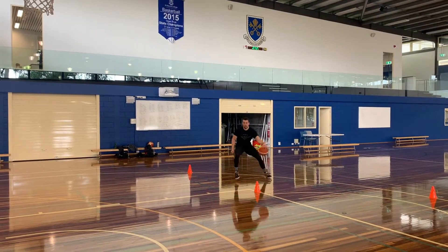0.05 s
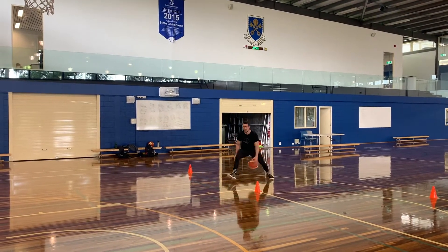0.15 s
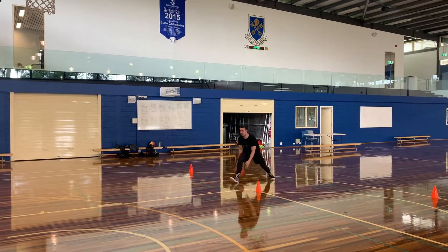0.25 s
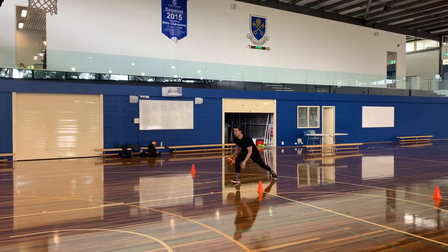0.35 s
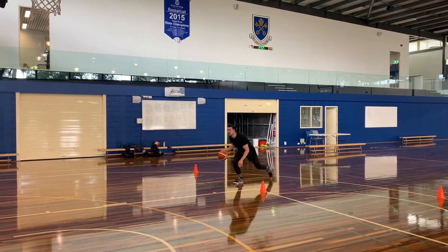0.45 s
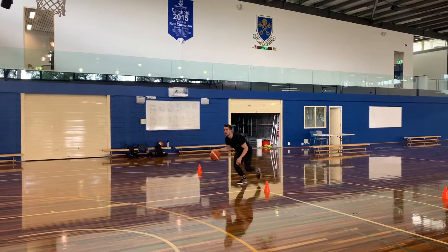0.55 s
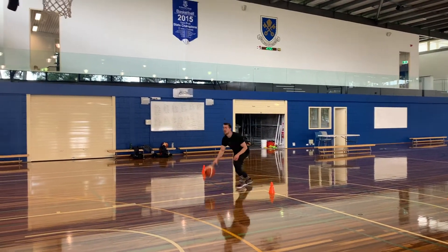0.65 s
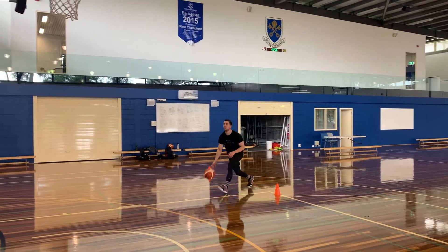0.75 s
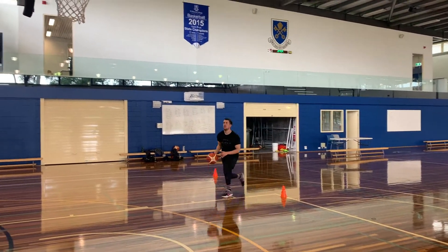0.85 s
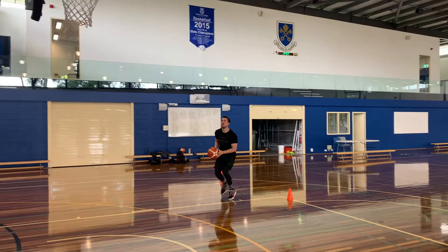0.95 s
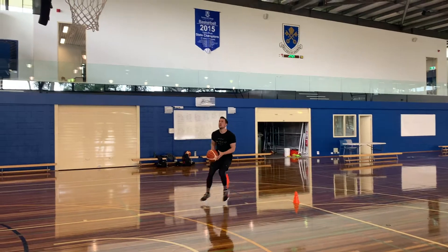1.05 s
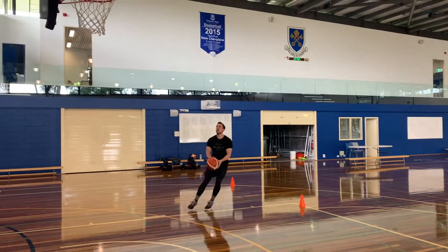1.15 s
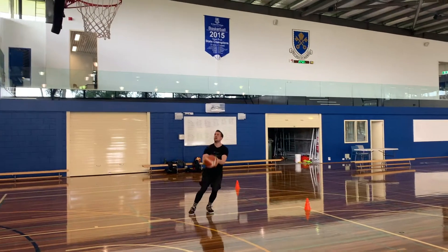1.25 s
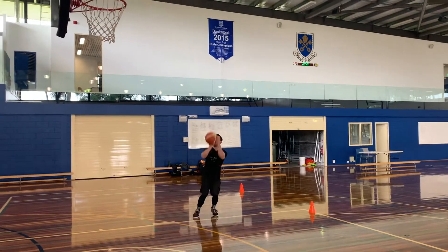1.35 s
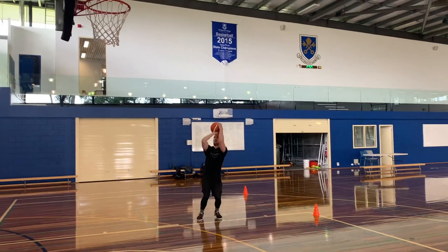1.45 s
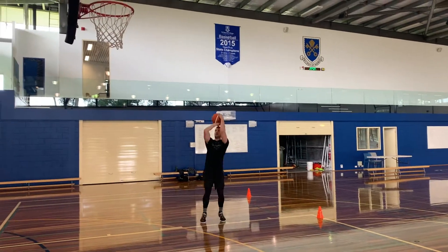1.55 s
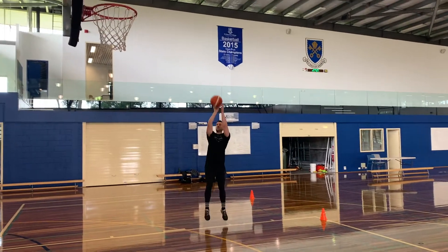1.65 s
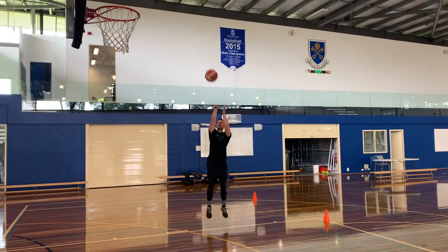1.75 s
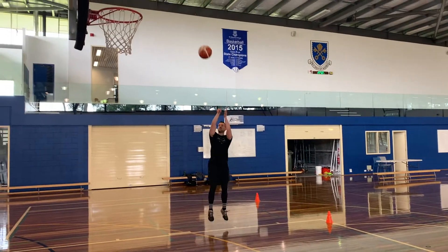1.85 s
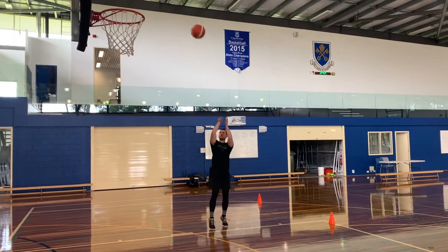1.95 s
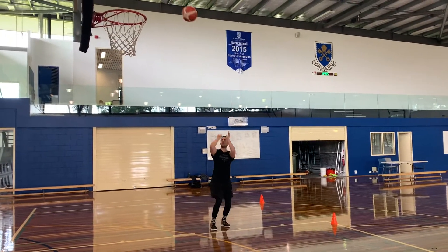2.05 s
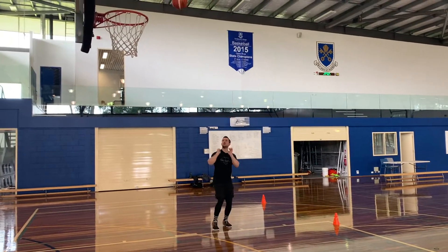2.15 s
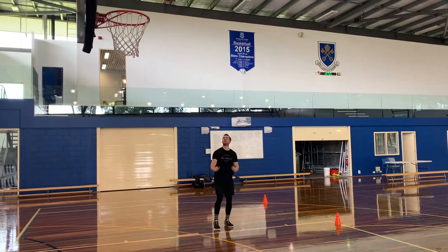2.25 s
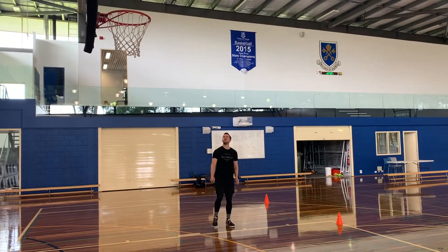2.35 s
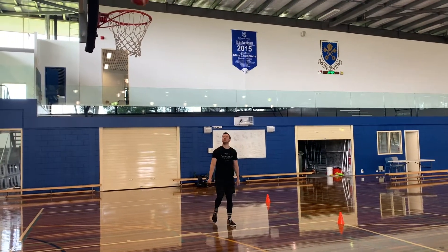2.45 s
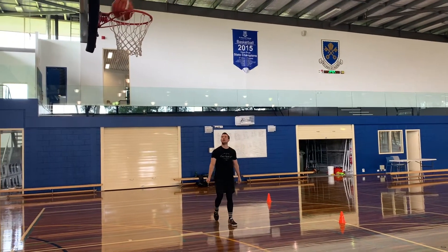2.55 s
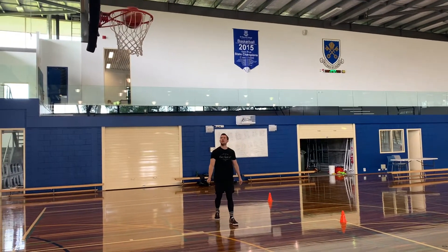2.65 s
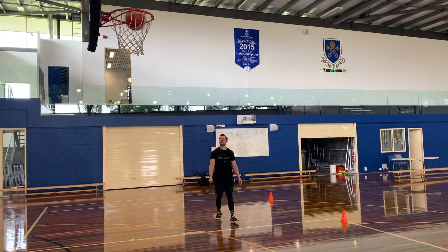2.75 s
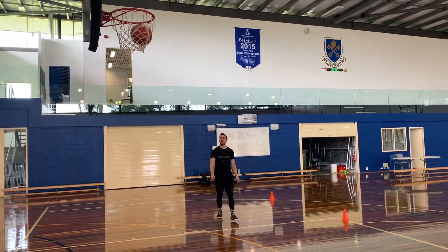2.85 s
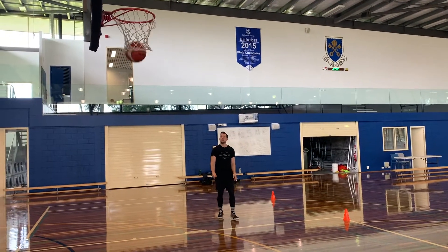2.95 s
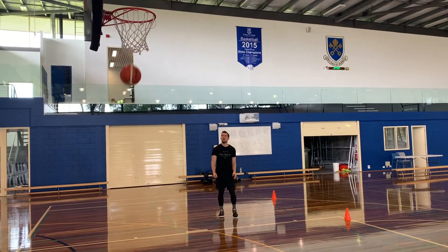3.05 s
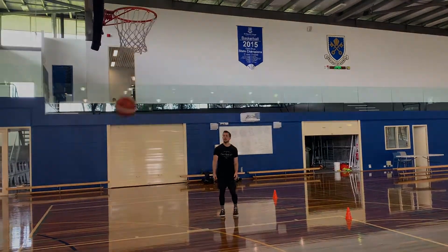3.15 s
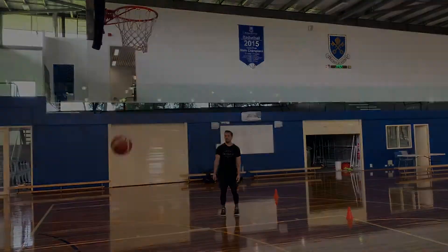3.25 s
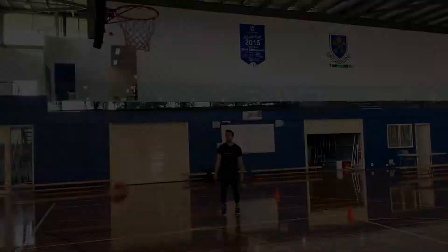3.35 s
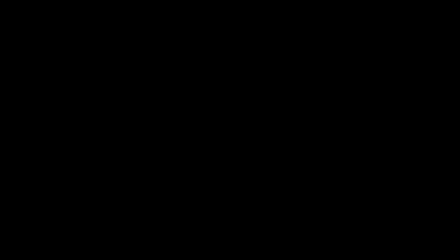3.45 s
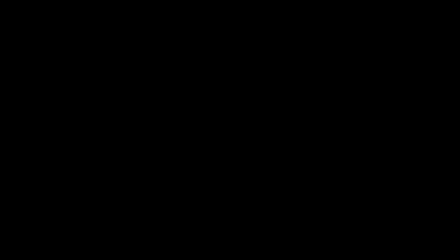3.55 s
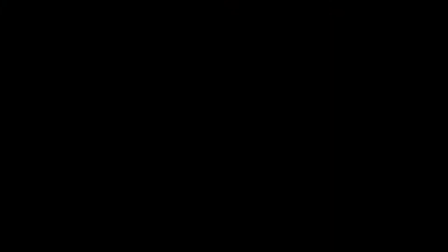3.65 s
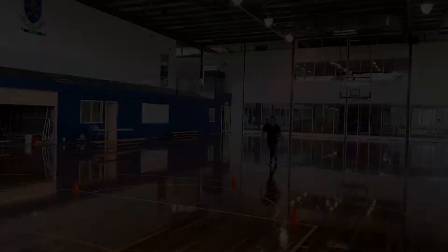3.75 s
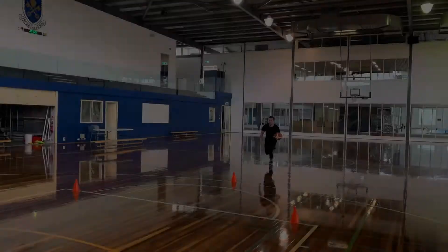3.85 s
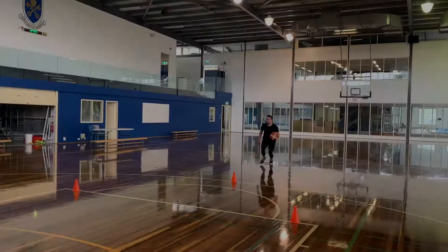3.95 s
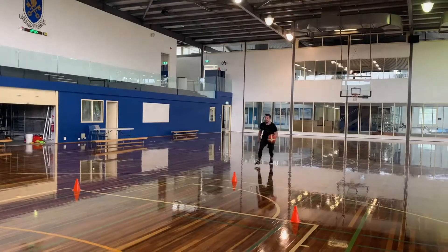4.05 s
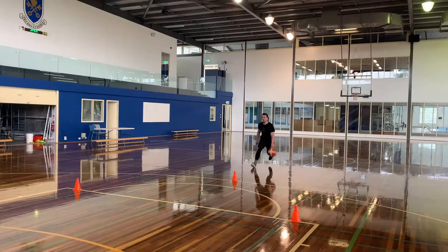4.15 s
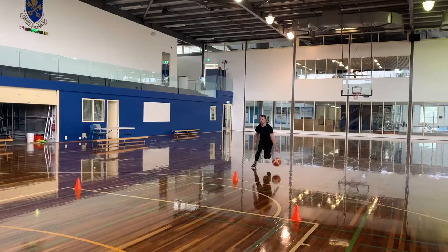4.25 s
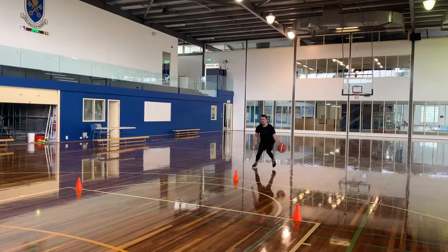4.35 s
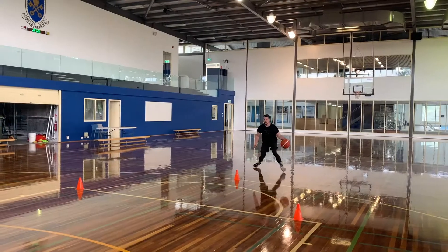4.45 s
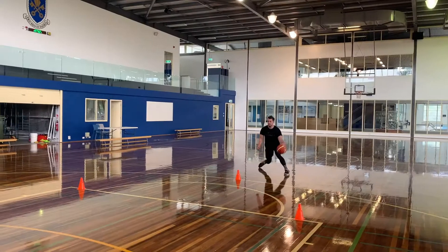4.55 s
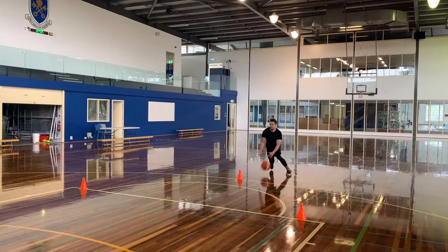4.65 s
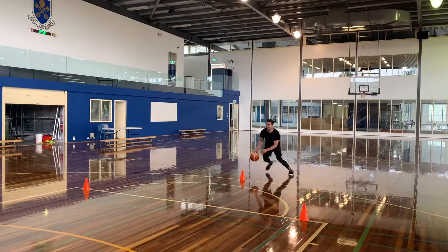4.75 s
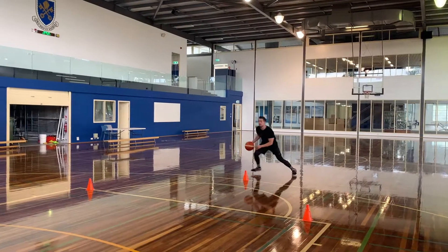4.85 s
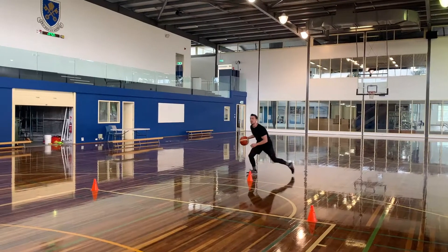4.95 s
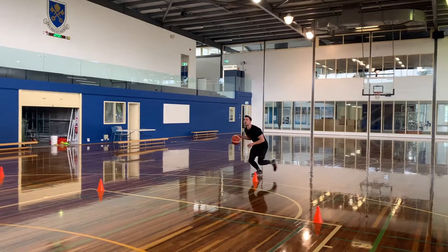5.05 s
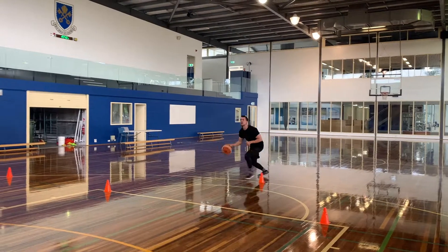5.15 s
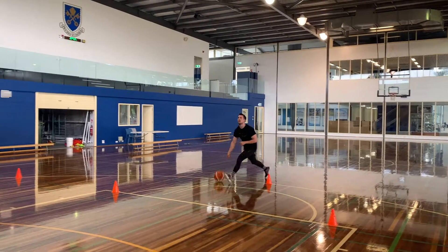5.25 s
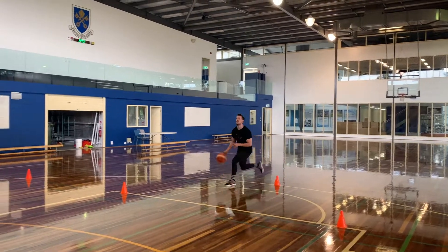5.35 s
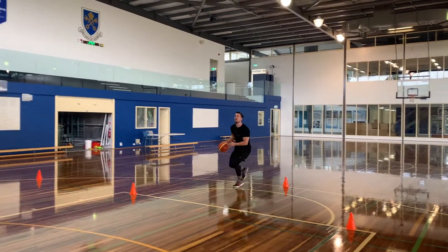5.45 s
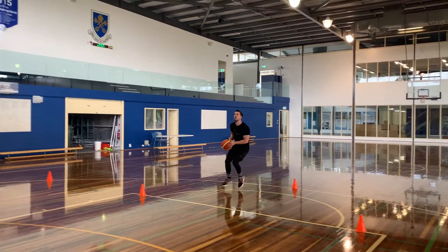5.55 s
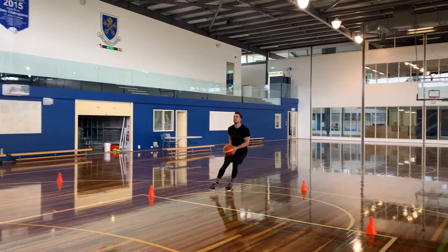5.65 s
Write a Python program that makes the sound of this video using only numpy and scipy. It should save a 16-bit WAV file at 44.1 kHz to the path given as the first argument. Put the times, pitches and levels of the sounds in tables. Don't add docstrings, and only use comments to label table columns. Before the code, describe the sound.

A large, hard-walled sports hall with low ventilation rumble, heard in wide stereo from some distance. Very short, high rubber squeaks chirp far off around 0.1 s. A basketball bounces lightly at 0.2 s and firmly at 0.7 s: each blow is a sharp tick, a brief hollow ping and a deep floor thump, with slapback echoes and a long tail. Near 1.15-1.25 s come a soft step and fainter, nearer squeaks; small footfalls tap at about 1.9-2.0 s. At 2.54 s a shot clips the hoop and rubs through the net, a scratchy swish with a dull board shudder until about 2.9 s. The ball smacks the floor at 3.5 s, echoing. The level dips around 3.6-4.1 s as the scene changes. Dribbles follow at 4.2, 4.7 and 5.25 s, the first the heaviest, with light steps between them and a faint, steady mid-pitched lamp hum until the end.

```python
import sys
import numpy as np
from scipy import signal
from scipy.fft import rfft, irfft
from scipy.io import wavfile
from scipy.ndimage import uniform_filter1d

SR = 44100
rng = np.random.default_rng(int(sys.argv[2]) if len(sys.argv) > 2 else 0)


def invert_db(x):
    u = np.asarray(x, float) / 20
    return 10 ** u


def master(y):
    cut = np.clip(np.atleast_2d(y).T, -1, 1)
    pcm = np.round(cut * 32767)
    wavfile.write(sys.argv[1], SR, pcm.astype(np.int16))


N = 250929
LEAD = SR // 2
M = N + LEAD
PRE = 512
NET_START_S, NET_END_S = 2.544, 3.4

# (time [s], tick [dB], thump [dB], ping [dB], hall send [dB])
BOUNCES = [
    (-.3, -40, -34, -40, 10.5),
    (0.2194, -14, -21, -23.5, 1.5),
    (0.6948, -7, -9.5, -13, 4),
    (2.5421, -36, -16, -58, -17),
    (3.4858, -5, -11, -42, 5),
    (4.2268, -5, -7, -20, 5.5),
    (4.6754, -7.5, -16.5, -16, 1.5),
    (5.2582, -6.5, -14.5, -14.5, 4),
]


def evened(x):
    return x / np.sqrt(np.mean(x ** 2) + 1e-20)


def read(points, hz):
    f, value = np.transpose(points)
    return np.interp(np.log(hz + 1), np.log(f + 1), value)


def add(mix, s, sound):
    part = mix[..., LEAD + round(s * SR):][..., :sound.shape[-1]]
    part += sound[..., :part.shape[-1]]


def tint(x, points):
    size = x.shape[-1]
    gain = invert_db(read(points, np.fft.rfftfreq(size, 1 / SR)))
    return irfft(rfft(x) * gain, size)


def resonate(x, hz, width):
    turn = np.exp(2j * np.pi * np.cumsum(hz * np.ones(len(x))) / SR)
    r = np.exp(-np.pi * width / SR)
    return 2 * (turn * signal.lfilter([1 - r], [1, -r], x / turn)).real


def swells(t, at, db, rise_s, fall_s):
    since = t - at[:, None]
    return (invert_db(db)[:, None] * np.exp(np.minimum(since / rise_s, -since / fall_s))).sum(0)


def diffuse(gain):
    # (frequency [Hz], side minus mid [dB])
    sides = [(60, -17), (110, -12), (200, -8.5), (380, -1.5), (700, 5), (1290, 3), (2380, 1.5), (4400, 0.5),
             (8120, 2.5), (15000, -17)]
    lean = 0.18
    a, b, c, d = rng.standard_normal((gain.shape[1], 513, 4)).T
    mid = a + 1j * b
    width = invert_db(read(sides, np.fft.rfftfreq(1024, 1 / SR)))[:, None]
    side = width * (lean * mid + np.sqrt(1 - lean ** 2) * (c + 1j * d))
    return signal.istft(np.array([mid, side]) * gain, nperseg=1024, noverlap=768)[1]


def placed(mid):
    # (frequency [Hz], side minus mid [dB])
    tick_side = [(60, -14), (300, -18), (800, -9), (1800, -6), (2800, 0), (6400, 2), (9800, 7), (13000, 3),
                 (16000, -3)]
    return np.array([mid, np.roll(tint(mid, tick_side), 4)])


def air():
    # (frequency [Hz], density [dB per Hz])
    room_tone = [(15, -36), (25, -16), (101, -2), (291, -11), (541, -21.5), (1300, -19), (2820, -30.5),
                 (3300, -27), (4610, -41), (7350, -75), (8150, -90), (10300, -49), (12000, -63),
                 (15600, -82), (22000, -120)]
    colour = invert_db(read(room_tone, np.fft.rfftfreq(1024, 1 / SR)))[:, None]
    sound = diffuse(colour * np.ones(M // 256 + 5))[:, :M]
    return invert_db(-49) * sound / np.std(sound[0])


def lamp_hum(t):
    # (time [s], level [dB])
    lamp = [(3.3, -90), (3.75, -64), (4.2, -61.5), (5.7, -59)]
    return invert_db(np.interp(t, *np.transpose(lamp))) * np.sin(2 * np.pi * 600 * t)


def tail():
    # (frequency [Hz], time to fall 60 dB [s])
    hall_t60 = [(50, 2.52), (160, 3.2), (420, 2.16), (1100, 3.08), (2900, 4.02), (5000, 2.7), (8000, 1.27),
                (14000, 0.33)]
    # (frequency [Hz], level [dB])
    boom = [(50, -7), (100, 21.5), (160, 7), (240, 14.5), (390, 9), (600, 14.5), (1000, 4), (9000, -35),
            (14000, 12.5)]
    early_t60_s, gap_s, rise_s = 0.26, 0.013, 0.0092
    hz, t = np.fft.rfftfreq(1024, 1 / SR)[:, None], np.arange(430) * 256 / SR
    late = invert_db(-60 * t / read(hall_t60, hz))
    early = np.maximum(invert_db(read(boom, hz)) - 1, 0) * invert_db(-60 * t / early_t60_s)
    lumps = evened(uniform_filter1d(rng.standard_normal((len(t), 513)).T, size=24, axis=0))
    sound = diffuse((late + early) * invert_db(2.6 * lumps * np.exp(-t / 0.8)))
    since = np.maximum(np.arange(sound.shape[1]) / SR - gap_s, 0)
    return sound * (1 - np.exp(-since / rise_s)) / np.linalg.norm(sound[0])


def squeak(length, hz, db, bite_db):
    # (multiple of the pitch, level [dB])
    squeak_overtones = [(2, -2.5), (3, -25)]
    sag, sag_s, bite_s = 0.129, 0.0062, 0.017
    patch_gap, patch_db = .055, -8
    t = np.arange(0, length, 1 / SR)
    waver = evened(uniform_filter1d(rng.standard_normal((8000, 2)).T, size=200))[:, :len(t)]
    settling = 1 + sag * np.tanh(invert_db(bite_db)) * np.exp(-t / sag_s)
    pitch = hz * settling * (np.array([[1], [1 + patch_gap]]) + .02 * waver)
    turns = np.cumsum(pitch, axis=1) / SR
    over = sum(invert_db(d) * np.sin(2 * np.pi * k * turns) for k, d in squeak_overtones)
    tone = np.sin(2 * np.pi * turns) + invert_db(bite_db) * np.exp(-t / bite_s) * over
    rough = evened(uniform_filter1d(rng.standard_normal((8000, 2)).T, size=90))[:, :len(t)]
    tone *= 1 + 0.075 * rough
    return invert_db(db) * (tone[0] + invert_db(patch_db) * tone[1]) * signal.windows.tukey(len(t), .5)


def squeaks():
    # (start [s], length [s], pitch [Hz], level [dB], bite [dB])
    far_slips = [
        (-.2, 0.034, 4630, -35, -12.5),
        (-.13, 0.084, 4310, -35, -11.5),
        (.0742, 0.012, 4250, -32.5, 4.5),
        (0.1, 0.016, 4216, -32.5, -6.5),
    ]
    # (start [s], length [s], pitch [Hz], level [dB], bite [dB])
    near_slips = [
        (1.173, 0.007, 4610, -39.5, -29),
        (1.181, .012, 4980, -49, -21),
        (1.19, 0.014, 4670, -44, -30),
        (1.201, 0.0092, 4810, -47, -30),
        (1.218, 0.025, 4895, -43.5, -36),
    ]
    for slips, send_db in ((far_slips, 3.5), (near_slips, -.5)):
        for s, *slip in slips:
            yield s, squeak(*slip), send_db


def net():
    # (time [s], rub [dB], board shake [dB], board knock [dB])
    tugs = [
        (2.552, -43, -20.5, -17.5),
        (2.62, -30.5, -28, -20),
        (2.648, -33.5, -48, -41),
        (2.688, -41, -29, -17.5),
        (2.773, -35.5, -29.5, -26.5),
        (2.838, -36.5, -28.5, -32),
        (3.1, -72, -51, -62),
    ]
    # (frequency [Hz], density [dB per Hz])
    net_colour = [(180, 12), (300, 4.5), (678, -11.5), (978, -4.5), (2790, -9), (3350, -8.5), (8640, -19),
                  (10600, -18.5), (12500, -45), (13300, -67), (16000, -62)]
    # (frequency [Hz], width [Hz], level [dB])
    hoop = [(980, 62, 0), (1720, 210, 5.5), (2355, 27, -5), (3130, 18, -4), (3350, 16, 1), (3630, 15, 1),
            (4150, 23, -0.5), (4630, 210, 0.5), (5240, 40, -8), (5500, 35, -9), (6400, 50, -2),
            (6800, 50, -16)]
    # (frequency [Hz], width [Hz], level [dB])
    board_modes = [(59.8, 19, 6), (107.6, 16.8, 1.5), (186, 96, -3.5), (378, 190, -9)]
    s, rub_db, shake_db, knock_db = np.transpose(tugs)
    t = np.arange(NET_START_S, NET_END_S, 1 / SR)
    ends = signal.windows.tukey(len(t), .02)

    clumps = invert_db(1.8 * evened(uniform_filter1d(rng.standard_normal(len(t)), size=400)))
    snaps = rng.standard_normal(len(t)) * invert_db(2.2 * rng.exponential(1, len(t))) * clumps
    ring = sum(invert_db(db) * evened(resonate(snaps, hz, w)) for hz, w, db in hoop)
    rub = evened(tint(snaps, net_colour)) + .34 * evened(ring)
    rub *= swells(t, s, rub_db, 0.028, 0.03)

    low = rng.standard_normal(len(t))
    shake = sum(invert_db(db) * evened(resonate(resonate(low, hz, w), hz, w)) for hz, w, db in board_modes)
    sway = invert_db(-42.5) * np.exp(-(t - t[0]) / 0.56)
    shake = (swells(t, s, shake_db, 0.0027, 0.013) + sway) * evened(shake)

    knock = swells(t, s, knock_db, 0.0061, 0.0069) * np.sin(2 * np.pi * 205 * t)
    return (rub + shake) * ends, knock * ends


def slaps():
    # (roof delay [s], wall delay [s])
    echo_s = [(.021, .045), (.021, .0268), (.0194, .0442), (.0272, .0642), (.0166, .0345), (.0216, .0502),
              (.0215, .0515), (.0202, .0458)]
    # (roof loss [dB], wall loss [dB], ping off the wall [dB])
    echo_db = [(-20, -20, -60), (-27, -17, -50), (-7.5, -11.5, -35), (-6, -3, -60), (-9.5, -23, -42),
               (-9.5, -15, -48), (-9.5, -14, -42), (-10, -10, -17)]
    # (time [s], tick [dB])
    far_slaps = [
        (3.5458, -20.5),
        (3.552, -29),
        (3.6485, -20.5),
        (4.2027, -36),
        (5.286, -32),
        (5.3245, -32),
        (5.341, -24),
    ]
    # (time [s], ping [dB])
    skims = [
        (2.5433, -27),
        (2.556, -30),
        (4.1771, -35),
        (4.2366, -18.5),
        (5.2528, -30),
        (5.2985, -26),
    ]
    roof_ping_db, bright_db = -12, 2
    for (s, db, _, ping_db, _), (roof_s, wall_s), (roof_db, wall_db, back_db) in zip(BOUNCES, echo_s, echo_db):
        dull_ping_db = ping_db + roof_ping_db
        yield s + .0095, db - 22, dull_ping_db, -6
        yield s + roof_s, db + roof_db, dull_ping_db, bright_db
        yield s + wall_s, db + wall_db, back_db, bright_db
        yield s + wall_s + .0108, db + wall_db - 4.5, dull_ping_db, bright_db
    for s, db in far_slaps:
        yield s, db, db + roof_ping_db, bright_db
    for s, db in skims:
        yield s, db + roof_ping_db, db, bright_db


def tick(tick_db, ping_db, bright_db):
    # (frequency [Hz], density [dB per Hz])
    tick_colour = [(290, -21), (500, -1.5), (1340, 8.5), (2220, 2.5), (4310, -5), (5540, -9), (6810, -12),
                   (10400, -13.5), (13200, -19), (15600, -21), (17000, -40)]
    t = np.arange(-PRE, 3584) / SR
    decay = np.exp(-abs(t) / 0.00032) + 0.093 * np.exp(-abs(t) / 0.011)
    grit = rng.standard_normal(len(t)) * decay * (t >= 0)
    clicks = 1.5 * (t == 0) + .45 * grit
    twin = uniform_filter1d(clicks, size=3)
    twin_ms = rng.uniform(.95, 1.1)
    clicks = clicks + 1.1 * np.roll(twin, round(twin_ms * SR / 1000))
    octaves = np.log2(16 / 2)
    sound = tint(tint(clicks, tick_colour), [(2000, 0), (16000, bright_db * octaves)])
    ping = np.cos(2 * np.pi * 1000 * rng.uniform(.96, 1.04) * t)
    ping = ping * np.exp(np.minimum((t - .0015) / .0016, (.0015 - t) / .0024))
    return -invert_db(tick_db) * sound / abs(sound).max() + invert_db(ping_db) * ping


def thump(db, ring_db):
    # (frequency [Hz], level [dB])
    boards = [(170, 6), (240, 5), (390, -4.5)]
    floor_hz, crest_s = 105.6, 0.00783
    t = np.maximum(np.arange(-PRE, 3584) / SR, 0)
    note_hz = floor_hz * (1 + rng.uniform(-0.36, 1) / 20)
    turns = np.cumsum(note_hz + 600 * np.exp(-t / 0.0036)) / SR
    turns -= np.interp(crest_s, t, turns)
    crest = invert_db(db - 1.5) * (t / crest_s * np.exp(1 - t / crest_s)) ** 4
    fade = np.cos(np.pi / 2 * t / t[-1])
    ring = invert_db(ring_db - 15) * np.tanh(t / .012) * np.exp(-t / .045) * fade
    rattle = sum(invert_db(d) * np.sin(2 * np.pi * (hz * rng.uniform(.9, 1.1) * t + rng.random())) for hz, d in boards)
    return (crest + ring) * np.cos(2 * np.pi * turns) + 0.27 * ring * rattle


def blow(tick_db, thump_db, ping_db, send_db, bright_db):
    return placed(tick(tick_db, ping_db, bright_db) + thump(thump_db, send_db))


def blows():
    # (time [s], tick [dB], thump [dB], hall send [dB], brightness [dB per octave])
    steps = [(1.137, -30.5, -30, -12, -7), (1.2, -47, -38, -15.5, 0), (1.925, -26.5, -34, -16.5, -15),
             (1.9444, -23, -27, -23, -14), (1.991, -47, -38, -26, 5), (4.141, -50, -27.5, -25, -9),
             (4.1825, -22, -19, -14, -2.5), (4.5252, -21, -26.5, -14.5, 0),
             (4.899, -26.5, -25, -17.5, -1.5), (5.204, -42, -28.5, -24, 3), (0.0778, -30, -48, -29, -4),
             (2.5436, -20, -48, -40, 6), (2.5436, -27, -36, -18, -38), (4.2065, -30, -42, -30, -10),
             (1.973, -31, -40, -26.5, -25)]
    for s, *levels in BOUNCES:
        yield s, (*levels, 3)
    for s, db, low_db, send_db, bright_db in steps:
        yield s, (db, low_db, db - 22, send_db, bright_db)


def scene():
    # (frequency [Hz], density [dB per Hz])
    hall = [(15, -38), (25, -28), (98, 3.5), (261, -10), (353, -19.5), (404, -18), (679, -32.5),
            (1020, -24.5), (3220, -31.5), (8590, -41.5), (10100, -33), (11900, -40), (13300, -102),
            (14800, -58), (17000, -103)]
    # (frequency [Hz], level [dB])
    ports = [(100, -0.5), (600, 0.5), (720, -3), (850, 3.5), (1150, 1), (7700, 1), (8650, -16),
             (9500, -5.5), (12300, -1), (13400, -33), (14600, -8)]
    # (time [s], level [dB])
    fade = [(0, 0), (3.3, -0.5), (3.58, -2), (3.61, -5.5), (3.8, -9), (4.1, -8.5), (4.2, -3), (5.7, 4)]
    direct, sends = np.zeros((2, M)), np.zeros((3, M))
    for k, (s, levels) in enumerate(blows()):
        add(direct, s - PRE / SR, blow(*levels))
        add(sends[k % 3], s, invert_db(np.array([levels[3]])))
    for s, *levels in slaps():
        add(direct, s - PRE / SR, placed(tick(*levels)))
    sends = tint(sends, hall) * invert_db(34.0)
    for s, sound, send_db in squeaks():
        add(direct, s, placed(sound))
        add(sends[1], s, sound * invert_db(send_db))

    (swish, knock), spread = net(), air()
    add(spread, NET_START_S, swish * [[1], [.6]] + knock * [[1], [.3]])
    add(sends[0], NET_START_S, swish * invert_db(2.0) + knock * invert_db(-17))
    spread += sum(signal.fftconvolve(send[None], tail(), axes=1)[:, :M] for send in sends)
    spread[0] = tint(spread[0], ports)

    t = np.arange(N) / SR
    mid, side = (direct + spread)[:, LEAD:] * invert_db(np.interp(t, *np.transpose(fade)))
    mid = mid + lamp_hum(t)
    return np.array([mid + side, mid - side])


def low_pass(x):
    return signal.sosfilt(signal.butter(12, 17170, fs=SR, output="sos"), x)


def record(dry):
    # (frequency [Hz], level [dB])
    dropout = [(4000, -112), (7000, -100), (10000, -89.5), (16000, -104.5)]
    # (frequency [Hz], level [dB])
    hiss_colour = [(8800, -44), (9800, -9.5), (12000, -11.5), (13000, -22), (15000, -4.5), (16500, -18)]
    hz, _, z = signal.stft(np.array([dry.mean(0), (dry[0] - dry[1]) / 2]), SR, nperseg=1024)
    band_power = (abs(z[:, :512]) ** 2).reshape(2, 64, 8, -1).mean(2)
    lost = band_power < invert_db(2 * read(dropout, hz[4::8]))[:, None]
    z[:, :512] *= np.repeat(~lost, 8, axis=1)
    mid, side = signal.istft(z, SR, nperseg=1024)[1][:, :N]
    hiss = invert_db(-79.5) * evened(tint(rng.standard_normal((N, 2)).T, hiss_colour))
    return low_pass(np.array([mid + side, mid - side]) + hiss)


dry = scene()
out = record(dry)
master(out)
```